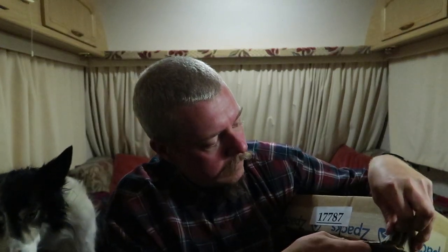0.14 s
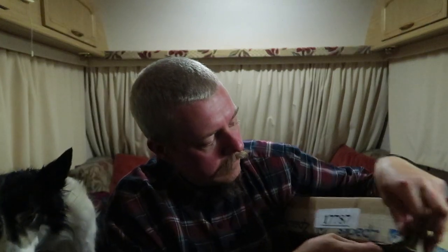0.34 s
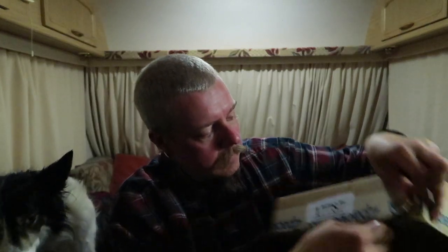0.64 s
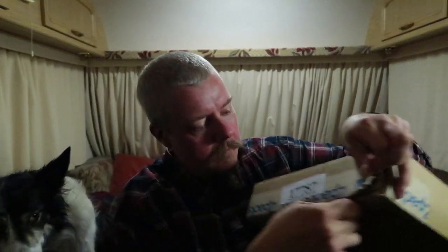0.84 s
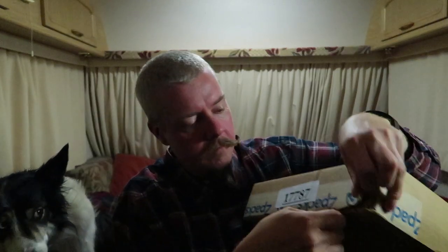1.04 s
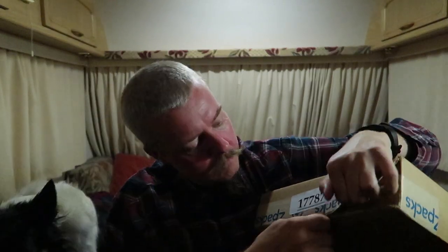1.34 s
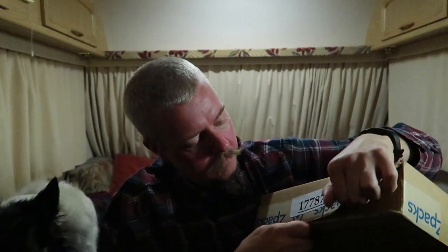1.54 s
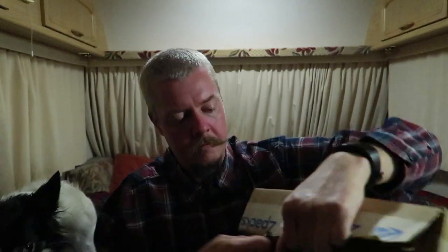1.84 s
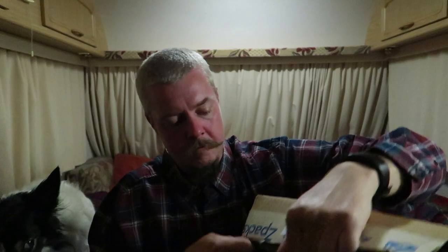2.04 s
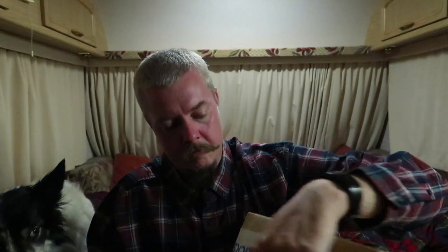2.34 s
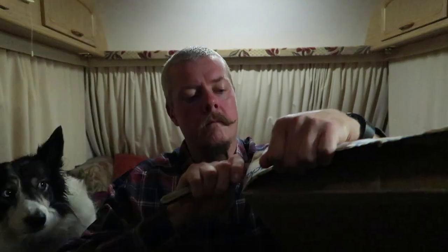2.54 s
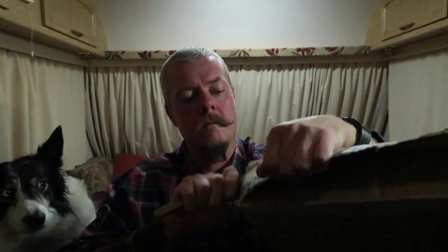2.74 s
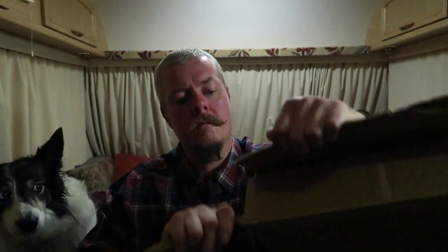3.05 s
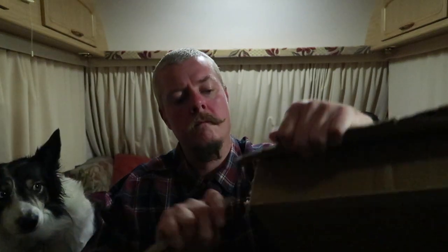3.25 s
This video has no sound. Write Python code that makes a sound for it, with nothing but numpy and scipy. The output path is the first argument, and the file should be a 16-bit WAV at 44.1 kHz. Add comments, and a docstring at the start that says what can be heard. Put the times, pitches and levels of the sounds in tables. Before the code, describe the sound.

A blade cuts through tape on a cardboard box, with sharp cracks and short rips.

```python
"""A small, softly furnished room, where a cardboard box is opened by hand.
A blade punches through tape and saws along a seam, catching and snapping free. The box is turned,
rubbing and bumping; tape ticks, and a flap clacks and is torn up. All friction is a train of tiny
fibre breaks, and every touch rings the box panels, over a faint, steady room tone."""
import sys
import numpy as np
from scipy import signal
from scipy.io import wavfile

SR = 44100
rng = np.random.default_rng(int(sys.argv[2]) if len(sys.argv) > 2 else 0)


def to_wav(s):
    """Save 16-bit WAV."""
    ch = np.atleast_2d(s).T  # columns
    pcm = np.round(np.clip(ch, -1, 1) * 32767)  # PCM
    wavfile.write(sys.argv[1], SR, pcm.astype(np.int16))


N = 149940


def amp(db):
    """Decibels to gain."""
    return 10 ** (np.asarray(db) / 20)


def unit(x):
    """Scales to rms 1."""
    return x / np.sqrt(np.mean(x ** 2) + 1e-20)


def curve_at(points, hz):
    """Reads a curve on a log-frequency axis."""
    point_hz, values = np.transpose(points)
    return np.interp(np.log(hz + 1), np.log(point_hz + 1), values)


def add(mix, start_s, sound):
    """Drops a sound into the mix."""
    part = mix[max(round(start_s * SR), 0):][:len(sound)]
    part += sound[:len(part)]


def colour(x, eq, bass_db=0, treble_db=0, bass_hz=330, treble_hz=2900, size=2048):
    """Minimum-phase EQ of unit energy, with a bass shelf and a treble shelf on top."""
    hz = abs(np.fft.fftfreq(size, 1 / SR))
    shelves_db = bass_db / (1 + (hz / bass_hz) ** 4) + treble_db / (1 + (treble_hz / (hz + 1)) ** 4)
    log_gain = np.log(unit(amp(curve_at(eq, hz))) * amp(shelves_db))
    impulse = np.fft.ifft(np.exp(np.conj(signal.hilbert(log_gain)))).real
    return signal.fftconvolve(x, impulse[:size // 2])


def wander(t, per_s):
    """A random drift of about unit size."""
    knots = np.arange(0, t[-1] + 2 / per_s, 1 / per_s)
    return np.interp(t, knots, np.resize(rng.standard_normal(512), len(knots)))


def rasp(x, hz, db, relative_width=0.1, drift_octaves=0.14):
    """Adds the contact resonance, which drifts around hz as the contact moves over the flutes."""
    path_hz = hz * 2 ** (drift_octaves * wander(np.arange(len(x)) / SR, per_s=58.6))
    carrier = np.exp(2j * np.pi * np.cumsum(path_hz) / SR)
    pole = np.exp(-np.pi * relative_width * hz / SR)
    resonance = 2 * (carrier * signal.lfilter([1 - pole], [1, -pole], x / carrier)).real
    return x + amp(db) * resonance


def friction(strokes, eq, breaks_per_s, spread_db, slip_db, slips_per_s, hiss, rasp_db,
             attack_s=0.0012, release_s=0.0031, ease_per_db=0, firm_db=-28):
    """Strokes of tiny fibre breaks over a fine hiss, clumped by stick and slip."""
    out = np.zeros(N)
    breaking = rng.random(N) < breaks_per_s / SR
    sizes = amp(spread_db * np.minimum(rng.exponential(1, N), 4))
    signs = rng.choice([-1, 1], N)
    grain = unit(breaking * signs * sizes) + hiss * rng.standard_normal(N)
    for start_s, length_s, level_db, swell_db, bass_db, treble_db, rasp_hz in strokes:
        ease = 1 + ease_per_db * max(firm_db - level_db, 0)  # stretches the fades of light strokes
        t = np.arange(0, length_s + 5 * release_s * ease, 1 / SR)
        stick_slip = amp(slip_db * wander(t, slips_per_s))
        drive = unit(np.roll(grain, -round(start_s * SR))[:len(t)] * stick_slip)
        fade_in = np.minimum(t / (attack_s * ease), 1)
        fade_out = np.exp(-np.maximum(t - length_s, 0) / (release_s * ease))
        level = amp(level_db + swell_db * (np.minimum(t / length_s, 1) - 0.5))
        stroke = colour(drive * fade_in * fade_out * level, eq, bass_db, treble_db)
        add(out, start_s, rasp(stroke, rasp_hz, rasp_db))
    return out


def flex(hz, cycles, low_cut_hz=127):
    """A pushed panel swings once or twice; it is too small to radiate deep bass."""
    t = np.arange(SR // 20) / SR
    swing = np.sin(2 * np.pi * hz * t) * np.exp(-hz * t / cycles)
    return signal.lfilter(*signal.butter(1, low_cut_hz, "high", fs=SR), swing)


def crack(eq, decay_s, splinter_db):
    """One sharp break with a spray of splinters."""
    t = np.arange(SR // 20) / SR
    burst = amp(splinter_db) * rng.standard_normal(len(t)) * np.exp(-t / decay_s)
    burst[0] += 1
    return colour(burst / np.linalg.norm(burst), eq)


# Dark bed of room air: frequency_hz, relative_db
AIR_EQ = [(15, -40), (25, 3), (120, 0), (463, -6.5), (887, -0.5), (2610, -19), (6210, -23.5), (14800, -33),
          (16000, -53)]

def room_tone(level_db=-53):
    """The air of the quiet room: faint, steady noise."""
    return amp(level_db) * unit(colour(rng.standard_normal(N), AIR_EQ)[:N])


# Soft slides: start_s, length_s, level_db, swell_db, bass_db, treble_db, rasp_hz
RUBS = [(.01, 0.24, -48, -3, -11, -3, 950), (.34, 0.17, -46.5, 4, -9, -4.5, 3780),
        (.51, 0.25, -50, 3, -3.5, -6, 5940), (.75, 0.23, -48, 6, -4.5, -1, 7740),
        (.985, 0.17, -51.5, -1, 6.5, -7, 304), (1.17, 0.081, -47.5, -3, -9, 0, 1850),
        (1.25, .19, -55.5, 9.5, 1, -3.5, 7900), (1.67, 0.66, -49.5, -14, 0, -6.5, 900),
        (2.055, 0.14, -44.5, -6, -9, 1.5, 6400), (2.26, 0.13, -51, 4, 3, 0.5, 1010),
        (2.385, 0.17, -47, 1, 1, 4.5, 1580), (2.395, 0.13, -52, -13.5, -19, 2.5, 1630),
        (3.14, 0.14, -52, 7, 5.5, 2, 335), (3.175, 0.023, -37.5, -5, -7, -6, 9400)]
# Warm brush of cardboard: frequency_hz, relative_db
RUB_EQ = [(18, -46), (30, -5), (103, 2), (273, 4.5), (554, -3.5), (913, -3.5), (1220, -10), (1670, -8),
          (2610, -16.5), (5590, -16), (10200, -23.5), (16000, -32.5)]

def hand_rubs():
    """Hands and box slide: dense, hissy friction with soft edges."""
    return friction(RUBS, RUB_EQ, breaks_per_s=4000, spread_db=2.5, slip_db=2.23, slips_per_s=81.2,
                    hiss=1.23, rasp_db=0, attack_s=0.023, release_s=0.0093)


# Pushes of the blade: start_s, length_s, level_db, swell_db, bass_db, treble_db, rasp_hz
STABS = [(.076, 0.095, -41, 4, -3, -2.5, 9800), (.147, 0.065, -30, -5, -1.5, -0.5, 610),
         (.172, 0.012, -25, -6, -1, -0.5, 2250)]
# Tone of the puncture: frequency_hz, relative_db
STAB_EQ = [(18, -39), (30, 1.5), (81, -3.5), (150, -15), (230, -15.5), (310, -11), (450, -8.5), (822, -9.5),
           (1350, -15.5), (1500, -20), (2300, -16), (3670, -25), (5310, -18.5), (10200, -28.5),
           (16000, -55)]

def blade_stabs():
    """The blade enters the tape in short, gritty pushes."""
    return friction(STABS, STAB_EQ, breaks_per_s=2800, spread_db=3.5, slip_db=2, slips_per_s=223,
                    hiss=0.49, rasp_db=0.5)


# Layered snap hits: start_s, crack_db, thump_db, thump_hz, hollow_db, hollow_hz
SNAPS = [(0.0816, -16.5, -30, 710, -30, 885), (0.1507, -6, -21, 520, -15, 514),
         (.1622, -26, -15, 640, -21, 750), (.1745, -11, -12, 626, -16, 860),
         (0.1769, -3, -23, 405, -18, 2300), (.181, -19, -21, 490, -8, 515),
         (1.536, -9, -12.5, 226, -29, 895), (1.5427, -9.5, -23, 332, -18, 667),
         (1.6207, -8, -12, 605, -12.5, 580), (1.701, -2, -16.5, 282, -19.5, 832),
         (1.8836, -4.5, -7, 506, -7, 960), (1.9269, 8.5, -13, 446, -12, 2100),
         (1.966, 1, -5.5, 338, -6, 1720), (1.983, -9, -11, 420, -12.5, 1400),
         (2.012, -4.5, -17, 500, -14, 1530), (2.0315, -4.5, -3.5, 434, -8.5, 1640),
         (2.3691, -26, -26, 1090, -29.5, 1960), (3.0052, -25, -8, 223, -14.5, 1490),
         (3.0111, -1, -21, 436, -17, 1640), (3.0182, 0, -12, 407, -11, 1000),
         (3.0466, 3, -8, 346, -17, 1980), (3.271, -13, -26, 1320, -23.5, 1260)]
# Bite of the crack: frequency_hz, relative_db
CRACK_EQ = [(100, -30), (700, 5), (1700, 1.5), (3100, -10), (4500, -5.5), (6000, 5), (9000, -9.5),
            (12000, -7.5), (16000, -24)]

def board_snaps(rebound_s=0.00665, rebound_db=-15, crunch_s=0.004):
    """The board gives way: a crack, a panel swinging out and back, a crushed flute ringing hollow."""
    out = np.zeros(N)
    t = np.arange(SR // 20) / SR
    for start_s, crack_db, thump_db, thump_hz, hollow_db, hollow_hz in SNAPS:
        add(out, start_s, amp(crack_db) * crack(CRACK_EQ, decay_s=0.00061, splinter_db=-4))
        thump = amp(thump_db) * flex(thump_hz, cycles=0.61)
        add(out, start_s, -thump)
        add(out, start_s + rebound_s, amp(rebound_db) * thump)
        cavity = flex(hollow_hz, cycles=1.34)
        collapse = rng.standard_normal(len(t)) * np.exp(-t / crunch_s)
        crunch = signal.fftconvolve(collapse, cavity)
        add(out, start_s, amp(hollow_db) * np.linalg.norm(cavity) * crunch / np.linalg.norm(crunch))
    return out


# Stray ticks of tape: start_s, level_db
TICKS = [(0.266, -31.5), (1.3965, -25), (1.7091, -7.5), (1.7445, -11.5), (2.531, -23), (2.6616, -27),
         (2.67, -29), (2.707, -24), (2.727, -26), (2.7992, -24), (2.8287, -22.5), (2.9611, -16),
         (2.9893, -9.5), (3.066, -14), (3.282, -22)]
# Thin, bright click: frequency_hz, relative_db
TICK_EQ = [(100, -11), (1500, 1), (3000, -11), (6500, 5.5), (10000, -10.5), (16000, -9)]

def tape_ticks():
    """The tape ticks: small, clean cracks with little splinter."""
    out = np.zeros(N)
    for start_s, level_db in TICKS:
        add(out, start_s, amp(level_db) * crack(TICK_EQ, decay_s=0.0013, splinter_db=-18))
    return out


# Soft knocks: start_s, level_db, pitch_hz
BUMPS = [(0.7602, -21, 630), (0.9471, -25, 523), (1, -28, 300), (1.011, -31.5, 260), (1.044, -29.5, 363),
         (1.1122, -20, 276), (1.1346, -21.5, 310), (1.397, -29, 500), (1.606, -22.5, 190),
         (1.8907, -10.5, 284), (1.9109, -12.5, 274), (2.768, -27.5, 412), (2.983, -12.5, 220),
         (3.035, -25, 307), (3.0367, -11, 336), (3.0903, -14, 450), (3.1846, -26, 420)]

def finger_bumps():
    """Fingers bump the box, each flexing a panel for a moment."""
    out = np.zeros(N)
    for start_s, level_db, pitch_hz in BUMPS:
        add(out, start_s, amp(level_db) * flex(pitch_hz, cycles=0.72))
    return out


# Saw strokes: start_s, length_s, level_db, swell_db, bass_db, treble_db, rasp_hz
CUTS = [(1.454, 0.083, -39, 7.5, 2.5, 0.5, 7100), (1.536, 0.072, -34, 0.5, -1, -1, 7600),
        (1.619, 0.063, -36.5, -7.5, 2, -2.5, 8000), (1.702, 0.11, -38, 1.5, -1.5, 3.5, 8300),
        (1.881, 0.054, -32.5, -13.5, 5, -1.5, 1410), (1.928, 0.032, -25.5, -2, -1, 1, 1860),
        (1.967, 0.071, -25.5, -2.5, 1.5, -1, 1650)]
# Full body and scratchy top of the cut: frequency_hz, relative_db
CUT_EQ = [(18, -46), (30, -7.5), (204, 4.5), (415, -1), (937, 1), (1190, -4.5), (1670, -10), (2480, -15),
          (4300, -16), (5450, -12.5), (9460, -14.5), (13300, -23), (16000, -27)]

def blade_cuts():
    """The blade saws along the seam, breaking fibres in rasping strokes."""
    return friction(CUTS, CUT_EQ, breaks_per_s=2500, spread_db=3, slip_db=1, slips_per_s=212,
                    hiss=0.54, rasp_db=3, ease_per_db=0.024)


# A single flap hit: start_s, level_db, t60_s
CLACK = (2.613, -36.5, 0.084)
# Its muffled tone: frequency_hz, relative_db
CLACK_EQ = [(100, 2.5), (600, 6), (1600, 2), (3100, -2.5), (4500, -22), (16000, -36)]

def flap_clack():
    """A flap clacks once: a dull burst of noise that dies fast."""
    out = np.zeros(N)
    start_s, level_db, t60_s = CLACK
    t = np.arange(SR // 10) / SR
    burst = amp(level_db) * rng.standard_normal(len(t)) * np.exp(-np.log(1000) * t / t60_s)
    add(out, start_s, colour(burst, CLACK_EQ))
    return out


# Rips of the flap: start_s, length_s, level_db, swell_db, bass_db, treble_db, rasp_hz
TEARS = [(2.733, 0.083, -40.5, -18.5, -10.5, -3, 1650), (2.823, 0.021, -38, 5.5, -2.5, -1, 1790),
         (2.936, 0.047, -37, 7, -3.5, -2, 5960), (2.982, 0.025, -28, 11, -9.5, -5, 1810),
         (3.003, .047, -18.5, -6.5, -1, -2, 1640), (3.05, 0.071, -38, -2, 1.5, -4, 6230),
         (3.119, 0.023, -31.5, -3.5, -8.5, 0.5, 10400), (3.281, 0.018, -30.5, -14.5, -13, -4, 1340)]
# Tone of the rip: frequency_hz, relative_db
TEAR_EQ = [(18, -61), (30, -14), (100, 5.5), (165, -3.5), (260, 1), (380, -0.5), (569, -14), (850, -9.5),
           (1250, -14.5), (1910, -14.5), (3200, -25.5), (5740, -19.5), (9220, -27), (16000, -28.5)]

def flap_tears():
    """The flap tears from the tape: light pulls ease in and out, firm ones bite."""
    return friction(TEARS, TEAR_EQ, breaks_per_s=1900, spread_db=1, slip_db=-0.5, slips_per_s=223,
                    hiss=0.42, rasp_db=4, ease_per_db=0.43)


# Modes of the box panels: pitch_hz, relative_db, t60_s
PANEL_MODES = [(117.4, -40.5, 0.36), (197.5, -35, 0.2), (246, -33, 0.11), (373, -32, 0.13),
               (649, -33, 0.12), (890, -32.5, 0.087), (1407, -25, 0.035)]

def box_ring(x, ring_db=-27):
    """The panels ring briefly with whatever touches them."""
    t = np.arange(SR // 4) / SR
    ring = sum(amp(db) * np.cos(2 * np.pi * hz * t) * np.exp(-np.log(1000) * t / t60_s)
               for hz, db, t60_s in PANEL_MODES)
    return x + amp(ring_db) * signal.fftconvolve(x, ring)[:N]


# Decay of the room: frequency_hz, t60_s
ROOM_DECAY = [(100, 0.067), (500, 0.052), (2000, 0.16), (8000, 0.11), (16000, 0.086)]

def room_reverb(x, wet_db=-16.5, predelay_s=0.0018):
    """A short, soft tail from close walls and curtains."""
    hz, t, noise = signal.stft(rng.standard_normal(SR // 2), SR, nperseg=128)
    decay = np.exp(-np.log(1000) * t / curve_at(ROOM_DECAY, hz)[:, None])
    tail = signal.istft(noise * decay, SR)[1]
    tail *= np.arange(len(tail)) / SR > predelay_s
    return x + amp(wet_db) * signal.fftconvolve(x, tail / np.linalg.norm(tail))[:N]


def scene():
    """Blade, flap and hands sound through the box into the quiet room, in mono."""
    scrapes = blade_stabs() + blade_cuts() + flap_tears() + hand_rubs()
    air = room_tone()
    hits = board_snaps() + tape_ticks() + finger_bumps() + flap_clack()
    return (room_reverb(box_ring(scrapes + hits)) + air)[None]


def record(dry, ceiling=0.62, high_cut_hz=16050):
    """Soft-clips the highest peaks, then trims the very top."""
    rounded = dry / (1 + (dry / ceiling) ** 4) ** (1 / 4)
    lowpass = signal.firwin(301, high_cut_hz, window=("kaiser", 9), fs=SR)
    return signal.oaconvolve(rounded, lowpass[None], "same")


dry = scene()
out = record(dry)
to_wav(out)
```